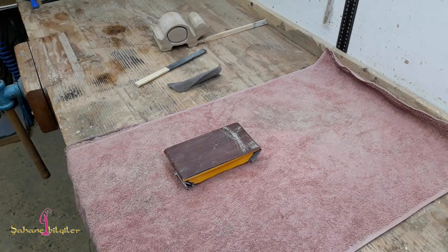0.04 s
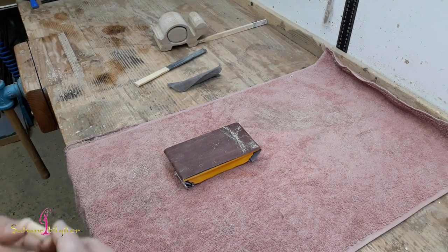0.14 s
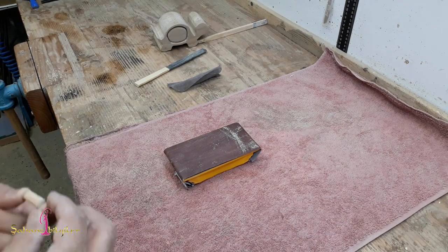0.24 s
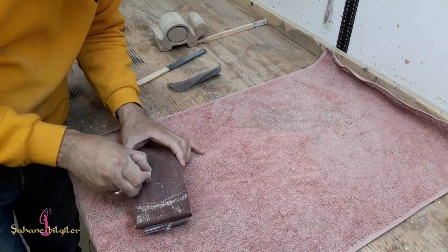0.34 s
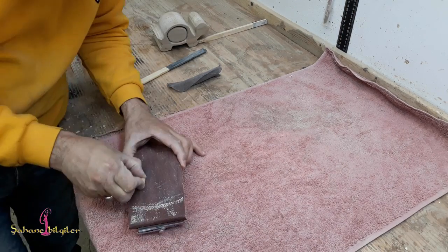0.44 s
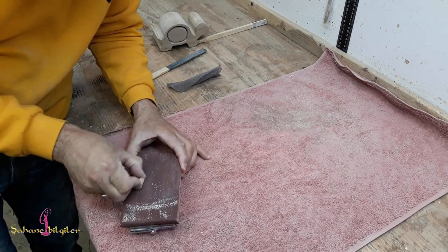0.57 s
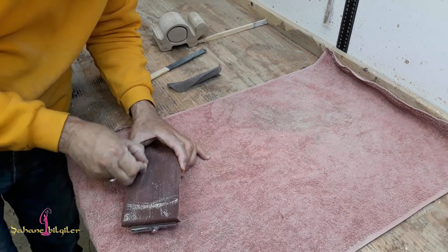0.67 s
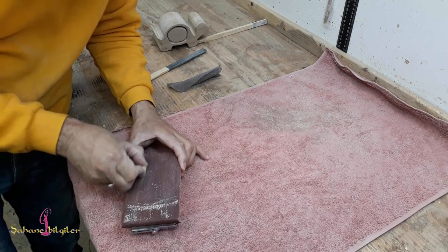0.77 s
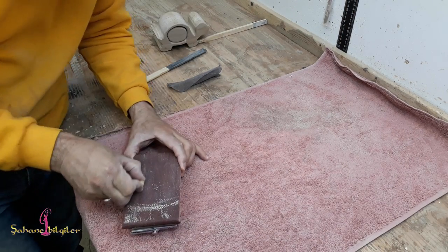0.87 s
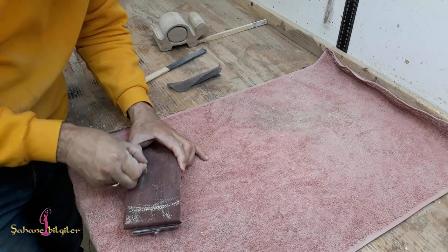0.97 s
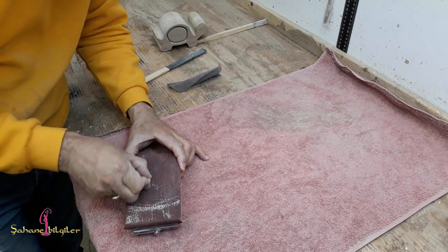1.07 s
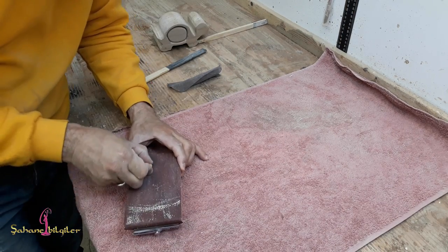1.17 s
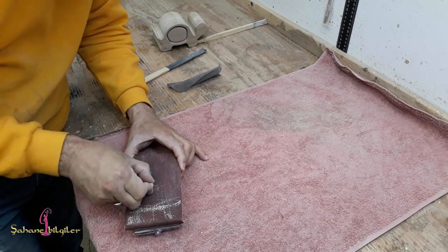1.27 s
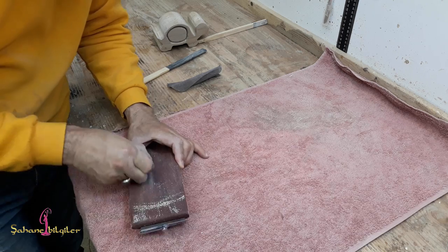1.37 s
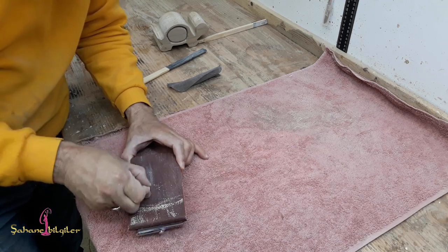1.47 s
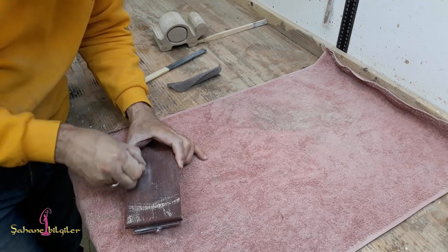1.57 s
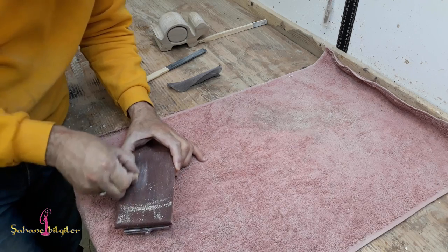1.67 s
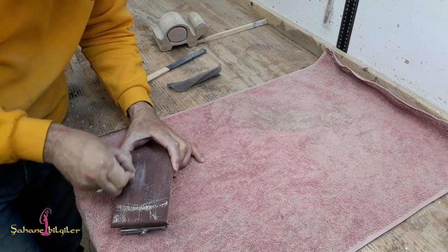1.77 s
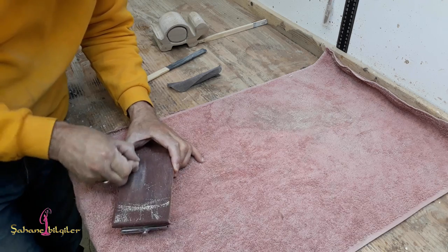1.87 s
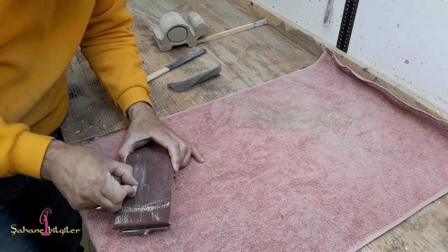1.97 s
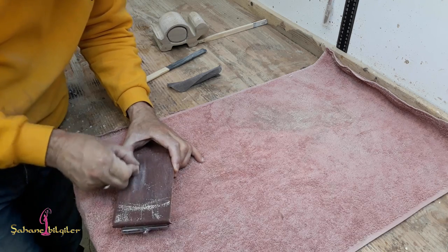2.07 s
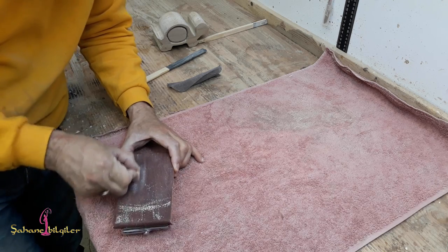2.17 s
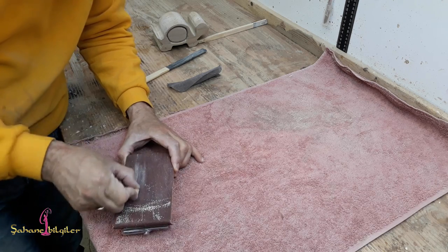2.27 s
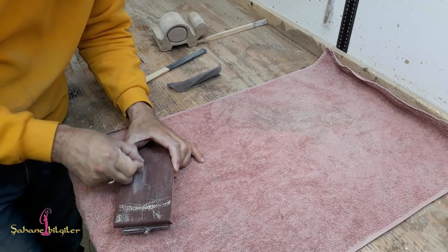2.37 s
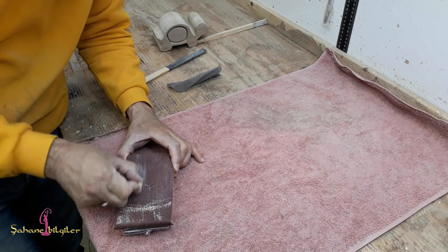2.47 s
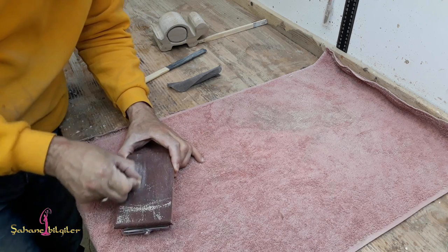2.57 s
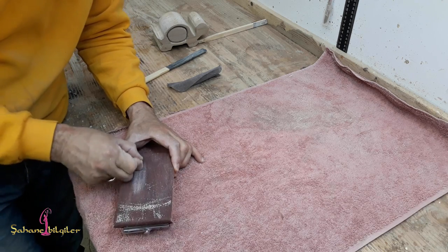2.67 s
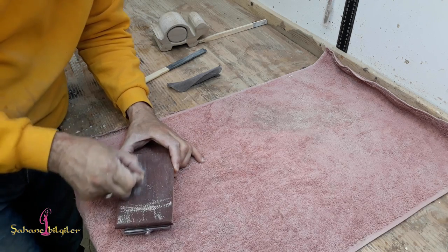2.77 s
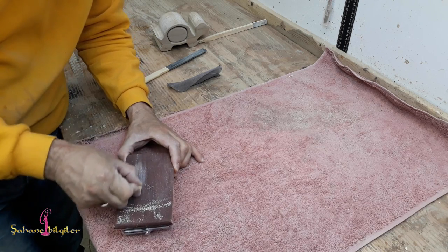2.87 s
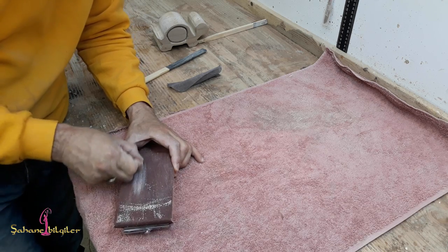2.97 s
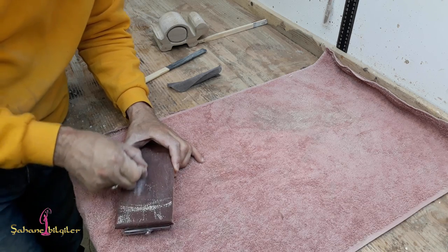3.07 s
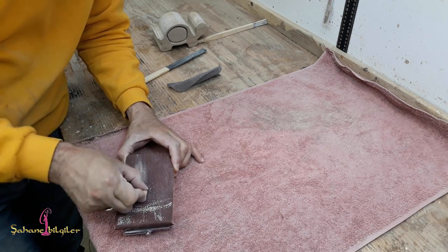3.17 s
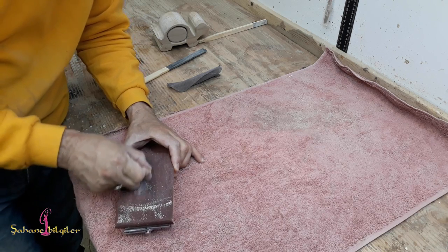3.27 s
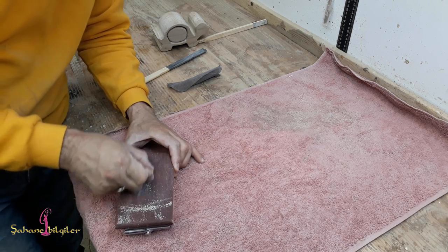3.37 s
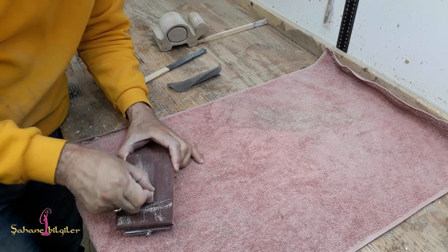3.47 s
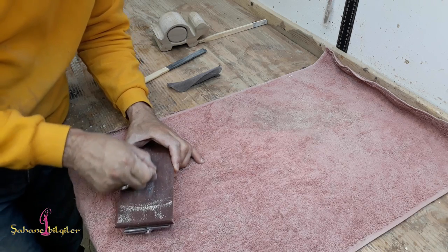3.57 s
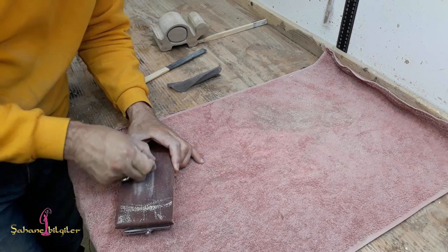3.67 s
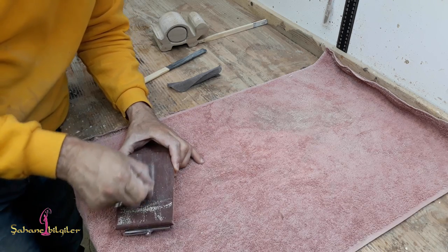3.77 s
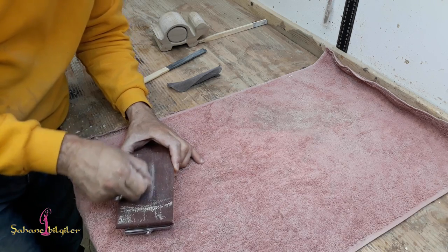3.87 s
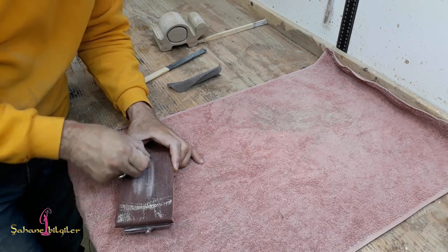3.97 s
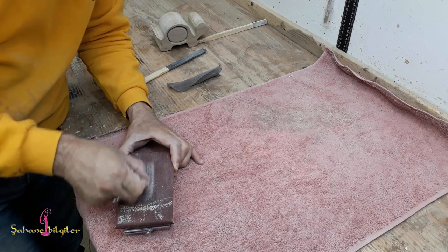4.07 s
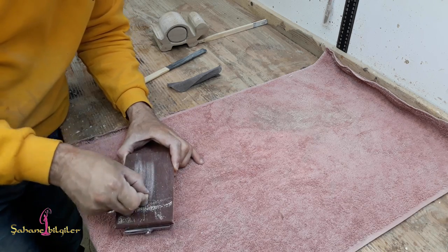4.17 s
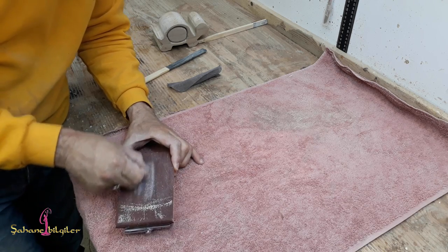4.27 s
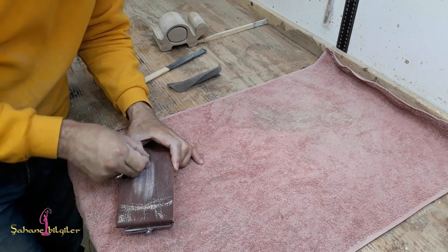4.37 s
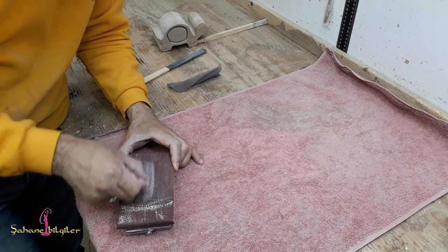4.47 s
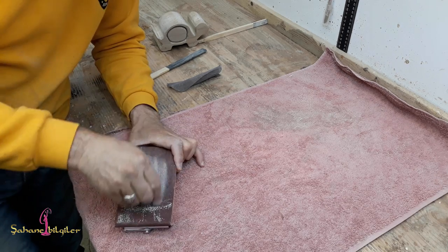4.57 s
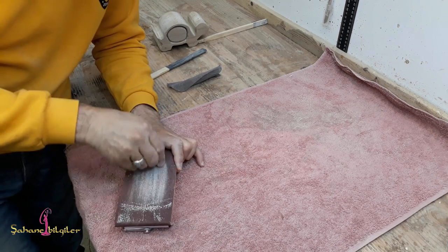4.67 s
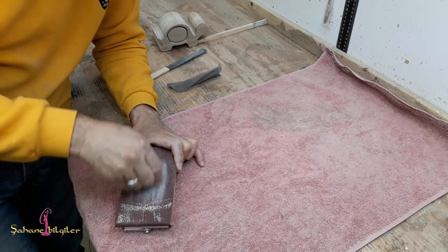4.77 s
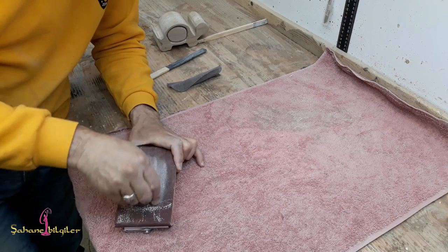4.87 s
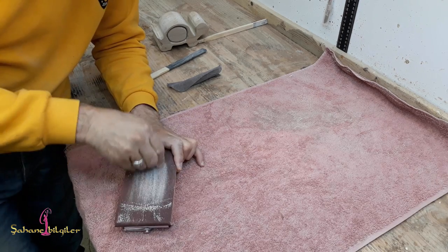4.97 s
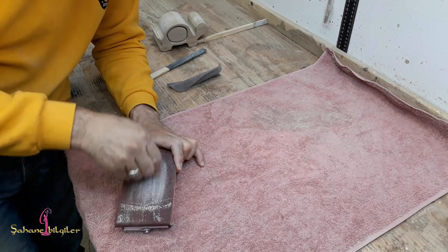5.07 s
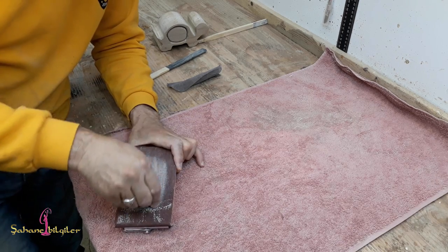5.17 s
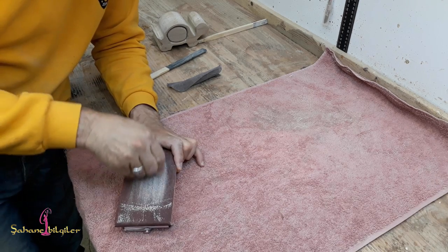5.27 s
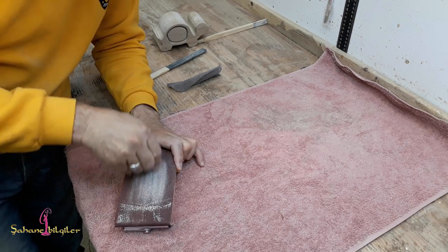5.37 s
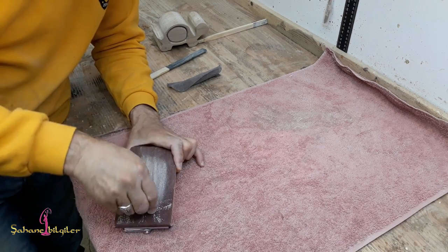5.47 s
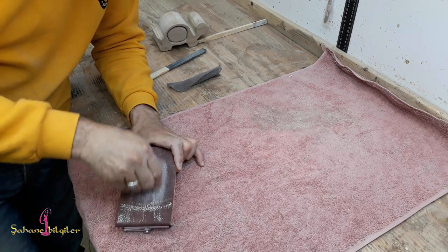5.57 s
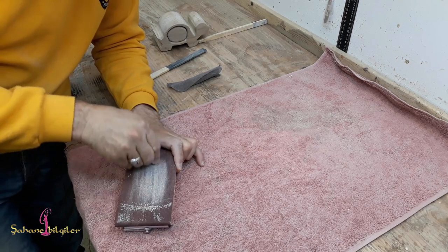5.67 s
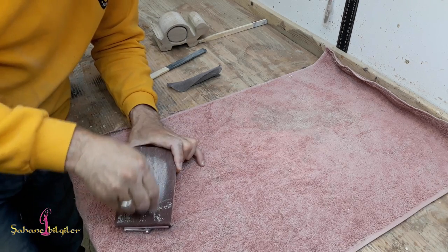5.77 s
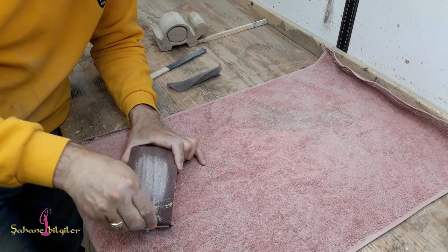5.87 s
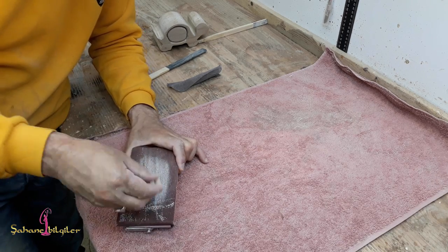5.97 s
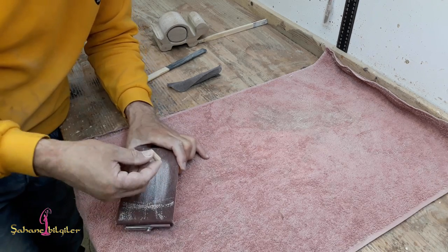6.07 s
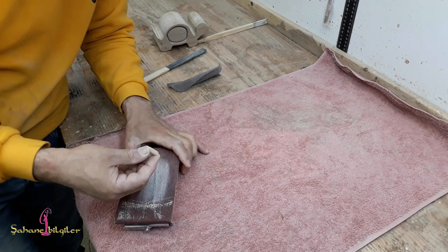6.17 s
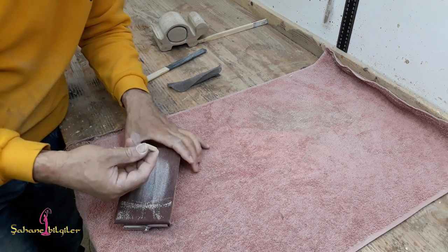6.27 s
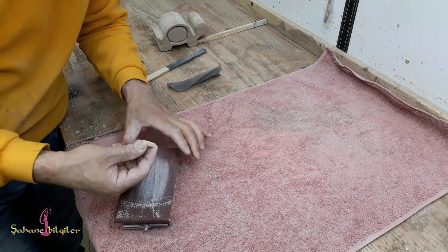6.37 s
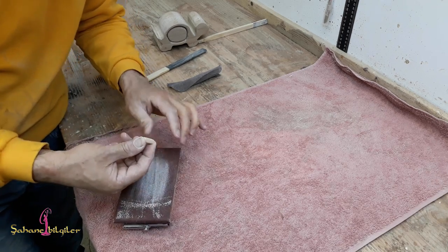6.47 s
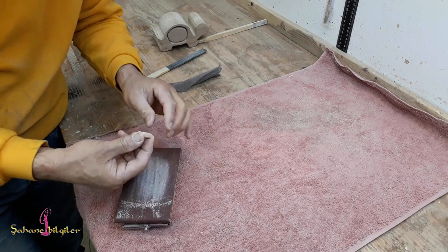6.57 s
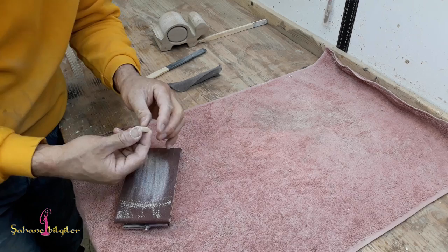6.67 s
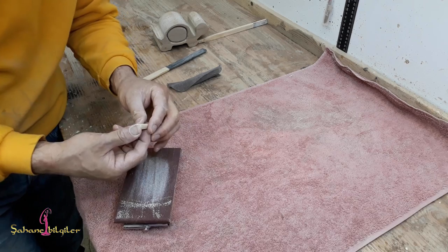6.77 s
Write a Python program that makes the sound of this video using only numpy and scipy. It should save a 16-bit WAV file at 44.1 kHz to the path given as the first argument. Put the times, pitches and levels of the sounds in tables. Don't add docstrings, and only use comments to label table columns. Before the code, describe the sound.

For the first 0.35 seconds there is only faint low room rumble, slight hiss and a barely audible creak. Then sanding starts, played far too fast: about fourteen back-and-forth cycles per second, a bright, gritty scritch-scratch with a high woody ring, strokes alternating in tone, with small cracks and chattering knocks, most noticeable from 0.4 to 2 seconds. It steadily grows fuller and louder until about 4.6 seconds. There the speed drops abruptly: slower, lower-pitched, coarser rasps, one every 0.16 seconds or so, with distinct dips at each reversal, small knocks and soft thumps into the padded bench. The last stroke tapers away around 5.9 seconds. From 5.9 to 6.4 seconds come faint finger rubs, a tiny tick near 6.3 and a low creak as weight lifts, then quiet room tone to the end, close to seven seconds. Close microphone, small, fairly dry workshop.

```python
import sys
import numpy as np
from scipy import signal
from scipy.fft import rfft, irfft, next_fast_len
from scipy.io import wavfile
from scipy.ndimage import uniform_filter1d

SR = 44100
rng = np.random.default_rng(int(sys.argv[2]) if len(sys.argv) > 2 else 0)


def int16_out(signal):
    q = np.round(np.clip(np.atleast_2d(signal).T, -1, 1) * 32767)
    wavfile.write(sys.argv[1], SR, q.astype(np.int16))


def volts(x):
    e = np.asarray(x, float) / 20
    return 10 ** e


N = 301158
TIME = np.arange(N) / SR
TRUE_SPEED_S = 4.629

# frequency in Hz, level in dB per Hz.
ROOM_TONE = [(15, -55.5), (25, -27), (70, -10.5), (82, -16), (101, -8), (228, -20.5), (471, -22),
             (875, -30), (14400, -33.5), (15200, -36), (15350, -75)]
# frequency in Hz, level in dB per Hz.
HISS = [(25, -12), (300, -14), (8300, -17), (9000, -50), (20000, -120)]
# frequency in Hz, t60 in seconds.
SHOP_DECAY = [(200, 0.36), (2000, 0.14), (10000, 0.44)]
# time in seconds, level in dB.
CREAK = [
    (0, -70),
    (.1, -76),
    (.2, -81.5),
    (5.9, -85.5),
    (6.05, -75),
    (6.2, -72.5),
    (6.35, -89),
]

# peak time in
# seconds, rub level in dB, fizz relative to the rub in dB, rise in seconds over 20 dB, fall in seconds over 20
# dB.
FINGERS = [(.25, -80, 5, .3, .4), (.358, -58, -14, .03, .02), (5.06, -55, -20, .04, .03),
           (5.712, -54, -20, .04, .03), (5.9, -68, -12, .02, .15), (6.02, -71, -9, .4, .2),
           (6.21, -72.5, -2, .12, .06), (6.297, -63, -16, .002, .018), (6.328, -64, -12, .06, .04),
           (6.348, -69, -12, .03, .02), (6.37, -78, -6, .1, .2)]
# frequency in Hz, level in dB per Hz.
RUB = [(400, -49), (700, -13.5), (1400, -13.5), (2600, -19.5), (3050, -7), (4250, -11), (4700, -18),
       (7000, -34), (13000, -120)]
# frequency in Hz, level in dB per Hz.
FIZZ = [(2650, -41.5), (4500, -10.5), (6000, -3.5), (6630, -6.5), (7530, -0.5), (10000, -18),
        (13000, -52.5), (22000, -120)]

# time in seconds, peak level in dB.
SNAGS = [(0.6459, -10), (1.057, -15), (1.438, -21), (1.565, -15), (1.8502, -16), (2.927, -14),
         (2.9365, -14), (3.596, -17), (2.63, -20), (2.7015, -20), (2.8527, -19), (3.766, -20),
         (4.3518, -18)]
# time in seconds, level in dB.
CATCHES = [(1.0196, -22), (1.071, -12.5), (1.3369, -23), (1.3683, -20.5), (1.8871, -21.5), (2.7726, -19.5),
           (2.8853, -23), (3.4764, -21), (3.5164, -22.5), (4.7795, -29), (4.8504, -30.5), (5.0854, -26.5),
           (5.1104, -25.5), (5.7684, -22.5)]
# three mode #
# frequencies in Hz, then hits of time in seconds, peak level in dB, t60 in seconds.
FAST_KNOCKS = [
    ((1250, 1540, 1860), [(.487, -41, 0.067), (.905, -44, 0.062)]),
    ((510, 530, 555), [(1.09, -43.5, 0.079), (1.338, -47, 0.15), (1.54, -46, 0.076), (2.038, -42.5, .13), (2.102, -41.5, 0.17), (4.09, -45.5, .12), (4.33, -47, 0.14), (4.42, -46.5, .15), (4.5, -47, 0.11)]),
    ((2500, 3300, 3100), [(.372, -44, .12), (.41, -45, .12), (1.055, -38.5, 0.061), (1.124, -34.5, 0.045), (1.193, -35.5, 0.065), (1.263, -37, 0.063), (1.333, -38.5, 0.071), (1.403, -42, 0.065), (1.436, -44, 0.12), (1.531, -32, 0.057), (1.602, -41.5, 0.067), (1.672, -37.5, 0.058)]),
]
# three mode frequencies
# in Hz, then hits of time in seconds, peak level in dB, t60 in seconds.
SLOW_KNOCKS = [((3230, 3580, 3900), [(4.766, -29, .14), (5.08, -30.5, .16), (5.394, -32, .17),
               (5.732, -32, .12)]), ((700, 780, 1270), [(4.76, -41, .3)]), ((1180, 1260, 1800),
               [(5.076, -35.5, .2), (5.105, -39, .12)]), ((612, 640, 1830), [(5.721, -36.5, .08)]),
               ((1000, 1085, 1140), [(4.845, -44, .12), (5.158, -37, .09), (5.18, -36, .12),
               (5.5, -45, .15)]), ((3300, 3420, 3700), [(4.835, -38, .15), (5.46, -37, .15),
               (5.255, -41, .1), (5.582, -43, .15)]), ((3680, 3800, 3950), [(5.01, -44, .2),
               (5.625, -41, .1), (5.655, -43, .2), (5.8, -38, .1)]), ((4650, 4900, 5150), [(4.93, -45, .25),
               (4.98, -43, .25), (5.31, -45, .25)]), ((2420, 2480, 2550), [(5.455, -42, .15)]),
               ((3050, 3600, 4150), [(6.2955, -56, .025), (6.3005, -60, .03)]), ((3000, 3200, 3450),
               [(6.318, -64, .15), (6.328, -63, .1)]), ((930, 1040, 1150), [(4.912, -47, .25),
               (4.95, -47, .2), (5.558, -44, .22), (5.588, -45, .2), (5.268, -47, .15)]), ((760, 772, 785),
               [(5.94, -70.5, .35), (5.968, -67, .3)]), ((4200, 4300, 4380), [(5.975, -75, 1.2)])]

# reversal in seconds, early level in dB, late level in dB.
PUSHES = [(0.361, -41, -37), (0.443, -36.5, -38.0), (0.518, -36, -37.0), (0.592, -32.5, -36),
          (0.662, -31.5, -34.5), (0.732, -31.5, -35), (0.803, -33.0, -36.0), (0.873, -35.5, -35),
          (0.944, -33, -36.0), (1.012, -29, -35.0), (1.082, -31, -33.5), (1.151, -31.5, -38.5),
          (1.22, -35, -36.0), (1.291, -33.5, -36), (1.361, -31, -36), (1.431, -27.5, -33.0),
          (1.493, -32, -36), (1.56, -30, -35), (1.631, -33.5, -39.5), (1.702, -33, -35.5),
          (1.772, -32.5, -36.5), (1.842, -31, -36), (1.914, -31.5, -34.5), (1.989, -31, -33),
          (2.058, -28.5, -32), (2.13, -30, -32), (2.202, -33, -35.5), (2.276, -31.5, -33.5),
          (2.35, -30.5, -35), (2.424, -30, -33.5), (2.499, -31.5, -33.0), (2.573, -31.0, -36),
          (2.648, -30.5, -34.5), (2.727, -30.0, -33.5), (2.802, -31, -34.5), (2.878, -30.5, -35),
          (2.955, -30.5, -34.5), (3.031, -29.5, -32.5), (3.105, -30.5, -33.5), (3.183, -30.5, -32.5),
          (3.258, -31, -32.5), (3.334, -27.5, -31), (3.41, -27.5, -30.5), (3.486, -29.5, -29.0),
          (3.563, -29.5, -31), (3.64, -30.0, -30.5), (3.718, -29, -28.5), (3.798, -27, -29.0),
          (3.875, -27.5, -31.0), (3.952, -29, -30.5), (4.027, -26.5, -28), (4.105, -30, -31),
          (4.186, -27.5, -28.5), (4.265, -28, -32), (4.345, -26.5, -29), (4.422, -27.5, -30.5),
          (4.502, -29.0, -30), (4.579, -29.0, -33), (4.655, -31, -31)]
# reversal in seconds, early level in dB, late level in dB.
PULLS = [(0.405, -37.5, -35.5), (0.481, -36.5, -34.5), (0.555, -37.5, -34.5), (0.628, -33.5, -29.5),
         (0.697, -34.5, -31), (0.768, -34.5, -33), (0.841, -36.5, -35.0), (0.908, -35.5, -32.0),
         (0.979, -32, -34.5), (1.046, -32.5, -28.0), (1.116, -33.5, -32), (1.187, -32, -32.5),
         (1.256, -33.5, -31.0), (1.325, -33.5, -31.5), (1.397, -32.5, -32.0), (1.465, -35.5, -29),
         (1.525, -33.0, -31.0), (1.595, -30, -29.5), (1.663, -31, -31.0), (1.738, -33.0, -31.5),
         (1.806, -32, -35), (1.877, -32.0, -30.5), (1.95, -32, -30), (2.023, -33.0, -30),
         (2.094, -32.5, -30), (2.165, -33.5, -28.5), (2.238, -30.5, -29.5), (2.312, -31, -29),
         (2.386, -33.5, -28), (2.461, -33.5, -29.5), (2.534, -34.5, -31.0), (2.608, -33.0, -28.5),
         (2.688, -32.5, -28.0), (2.764, -31.5, -28.5), (2.84, -32.0, -27.5), (2.915, -31.0, -26.5),
         (2.994, -33, -28.5), (3.069, -31.5, -28.5), (3.144, -33.0, -28.5), (3.221, -31, -28.0),
         (3.297, -31, -28.5), (3.373, -31, -28), (3.448, -28.5, -27.5), (3.525, -30.5, -29.5),
         (3.602, -29.0, -29.0), (3.68, -29.0, -28), (3.757, -28, -30), (3.836, -28.5, -27.5),
         (3.915, -29, -29.5), (3.989, -28.5, -28.5), (4.065, -30.0, -27.5), (4.146, -30, -27.5),
         (4.226, -29.5, -28.5), (4.306, -30.0, -28.0), (4.383, -31.5, -29.5), (4.462, -31.0, -27.5),
         (4.542, -31, -27), (4.617, -31.5, -30)]
# halt, early, late and wood level, all in dB.
LANDING = (-68, -46.5, -37.5, 0)
# reversal in seconds, halt level in dB, early level in dB, late level in dB.
SLOW = [
    (4.59, -39, -35.5, -37),
    (4.748, -60.5, -35.5, -32),
    (4.91, -51.5, -35, -37),
    (5.058, -56, -35, -30.5),
    (5.225, -49.5, -35.5, -37.5),
    (5.381, -58, -34.5, -32),
    (5.549, -50.5, -36, -35),
    (5.705, -58.5, -32, -34.5),
    (5.92, -69, -32, -41.0),
]
# end of the take-off, full early, full late and start of the halt as shares
# sped-up ones add the break-loose share of the stroke, share of ring left at the halt, jolt in dB.
FAST_PUSH = (0.1, 0.24, 0.65, 0.86, 0.82, 0.65, 0.0045, 1.02, 3.4)
FAST_PULL = (0.11, 0.22, 0.76, 0.83, 0.4, 0.8, 0.01, 1.03, 1.8)
SLOW_PUSH = (0.057, 0.22, 0.56, 0.83, 0.56, 0.52)
SLOW_PULL = (0.18, 0.62, 0.69, 1, 0.83, 0.57)
# stroke start in seconds, ring offset in dB.
ACCENTS = [(0.361, 2.5), (0.406, -2.0), (0.443, 1), (0.518, 1), (0.555, -2), (0.592, 1.5), (0.627, -5),
           (0.768, -2.0), (0.841, 1.5), (1.046, -1), (1.116, -2.0), (1.151, 1.5), (1.187, 2), (1.256, -3),
           (1.702, -0.5), (1.738, 0), (1.772, 2.0), (1.842, 3), (2.023, -1.5), (2.094, 1.5), (2.13, 1.5),
           (2.165, 1), (2.276, -2.5), (2.312, -2.0), (2.499, 1), (2.534, 2.5), (2.609, -1.5), (2.802, -2),
           (2.915, 0.5), (3.069, -3), (3.373, -3), (3.41, -4), (3.563, 2.0), (3.64, 2), (3.837, -1)]
# time in seconds, block ring in dB, piece ring in dB.
HOLD = [(.36, -8.5, 3.5), (.6, -20.5, -1), (.8, -14.5, 0), (1.05, -12, -0.5), (1.25, -11.5, 1.5),
        (1.55, -7.5, -.5), (1.7, -19.5, -0.5), (1.85, -25, -0.5), (2.3, -13, -0.5), (2.55, -8.5, 0.5),
        (3.0, -12, -2), (3.55, -5, 0), (4.0, -11, -2), (4.63, -10.5, -2.5)]
# reversal in seconds, stuck level in dB,
# early level in dB, late level in dB, time in seconds at which it slows down.
SLOW_RING = [(4.615, -60, -44.5, -54, 4.68), (4.749, -67, -40, -41.5, 4.87),
             (4.905, -58, -43.5, -56.5, 4.9), (5.062, -69.5, -39, -44.5, 5.17),
             (5.222, -59.5, -43, -52.5, 5.34), (5.381, -65.5, -44.5, -47, 5.515),
             (5.548, -61.5, -42, -52, 5.692), (5.713, -73, -39.5, -44, 5.79)]
# time in seconds, level in dB.
LIFTED = (5.916, -76.5)
# time in seconds, level in dB.
WEIGHT = [(.36, -58.5), (1.3, -54.5), (2.0, -54), (2.9, -51.5), (3.4, -52.5), (4.63, -50)]
# peak time in seconds, peak level in dB.
PRESSES = [(4.696, -60), (4.78, -61), (4.846, -44.5), (5.104, -41.5), (5.202, -47), (5.402, -59),
           (5.508, -46.5), (5.74, -48), (5.81, -54.5)]

# frequency in Hz, level in dB per Hz.
FAST_GRIT = [(15, -54), (25, -17.5), (184, -23.5), (500, -18.5), (1900, -17), (3750, -13), (4300, -11),
             (5600, -10.3), (8000, -10), (10000, -4.5), (12500, -5), (14000, -1.2), (15700, -3.5)]
SLOW_GRIT = [(15, -54), (25, -17.5), (120, -12.5), (435, -17.5), (706, -12.5), (2070, -7), (2900, -3),
             (3400, -1.5), (4200, -4), (7500, -4), (8300, -5), (9300, -13.5), (15700, -11)]
# frequency in Hz, share of the fade.
DULL = [(1600, 0), (2100, 1), (3500, 1), (3900, 0), (5100, 0), (5700, .4), (8000, .4), (9200, 0)]
# frequency in Hz, width in Hz, level in dB.
FAST_WOOD_EARLY = [(2540, 225, -9), (2966, 138, -11), (3594, 280, -6.5), (4090, 80, 1.5), (4390, 42, 4.5),
                   (4600, 95, -2), (4740, 214, 0.5)]
FAST_WOOD_LATE = [(3813, 130, -5.5), (4126, 80, -2), (4348, 45, 3.5), (4590, 130, -2.5), (4930, 83, -3)]
SLOW_WOOD_EARLY = [(597, 51, -2.5), (784, 130, 2), (1160, 190, -4), (1657, 100, -3)]
SLOW_WOOD_LATE = [(640, 100, -27), (938, 200, 9.5), (1180, 120, 8.5)]
# frequency in Hz, width in Hz, level in dB.
FAST_BLOCK = [(2503, 59, -2), (2997, 110, -1), (6220, 36, 0), (6320, 30, 5), (6320, 31, -6.5),
              (6820, 46, -2), (7276, 120, -0.5), (8200, 66, -3.5), (8730, 65, -0.5), (10300, 130, -11),
              (14500, 300, -4.5), (15220, 450, -6.5)]
SLOW_BLOCK = [(1870, 110, -7), (2290, 50, 6), (3390, 170, 7.5), (4720, 190, -13), (5600, 48, -3),
              (6400, 66, -6), (7400, 230, -4.5)]
# frequency in Hz, width in Hz, level in dB.
FAST_BENCH = [(50, 70, -9.5), (249, 64, -3.5), (328, 29, 0), (522, 62, 0)]
SLOW_BENCH = [(80, 60, -7), (133, 36, 0.5)]

# centre in seconds, centre in Hz.
BLURS = [(0.372, 12490), (0.38, 10080), (1.402, 10940), (1.472, 11200), (1.501, 12230), (1.959, 9220),
         (2.203, 10420), (2.284, 12660), (2.363, 9910), (2.426, 9130), (2.772, 9820), (3.219, 9820),
         (3.329, 10770), (3.448, 10770), (3.448, 12660), (3.593, 13350), (3.614, 10680), (3.672, 12140),
         (3.68, 10510), (3.892, 12660), (4.078, 11110), (4.081, 10590), (4.145, 11200), (4.191, 9910),
         (4.232, 14040), (4.232, 14730), (4.264, 11370), (4.38, 9820), (4.423, 14040), (4.566, 10590),
         (4.589, 12140), (4.653, 14130), (4.676, 10160), (4.763, 12140), (4.786, 12490), (4.789, 13610),
         (4.792, 14560), (4.795, 10160), (4.873, 10510), (4.876, 11630), (4.879, 14560), (4.949, 12490),
         (4.955, 10940), (4.96, 10510), (4.981, 14810), (5.079, 15330), (5.256, 14470), (5.306, 12920),
         (5.306, 14640), (5.332, 11200), (5.332, 13520), (5.352, 14470), (5.393, 14640), (5.419, 13260),
         (5.445, 11460), (5.605, 11970), (5.686, 12490), (5.689, 13700), (5.738, 11110), (5.744, 14300)]


def unit(x):
    return x / np.sqrt(np.mean(x ** 2) + 1e-20)


def along(points, hz):
    f, value = np.transpose(points)
    return np.interp(np.log(hz + 1), np.log(f + 1), value)


def over_time(points):
    return np.interp(TIME, *np.transpose(points))


def filtered(x, response):
    m = next_fast_len(N + SR // 8)
    return irfft(rfft(x, m) * response(np.fft.rfftfreq(m, 1 / SR)), m)[..., :N]


def coloured(x, colour):
    return unit(filtered(x, lambda hz: volts(along(colour, hz))))


def modes(table):
    def response(f):
        return sum((-1) ** k * volts(db) * 1j * f * w / (c * c - f * f + 1j * f * w)
                   for k, (c, w, db) in enumerate(table))
    return response


def swell(s, db, rise, fall):
    return volts(db - 20 * np.where(TIME < s, (s - TIME) / rise, (TIME - s) / fall))


def grit(spiky_db, patchy_db, frames):
    breaks = rng.standard_normal(N)
    size = np.minimum(rng.exponential(size=N // 8 + 1), 2.4)
    breaks = breaks * volts(spiky_db * size.repeat(8)[:N])
    z = signal.stft(breaks, nperseg=256)[2]
    field = uniform_filter1d(rng.standard_normal(z.shape), size=4, axis=0)
    field = uniform_filter1d(field, size=frames, axis=1)
    return unit(signal.istft(z * volts(patchy_db * unit(field)), nperseg=256)[1][:N])


def channel_hiss():
    hiss = volts(-87) * coloured(rng.standard_normal(N), HISS)
    return np.array([hiss, -hiss])


def room_tone():
    return volts(-74) * coloured(grit(0.35, 1.4, frames=20), ROOM_TONE)


def bench_creak():
    creak = filtered(rng.standard_normal(N), modes([(315.6, 40, 0)]))
    return volts(over_time(CREAK)) * unit(creak)


def shop_reverb(x):
    hz, t, z = signal.stft(rng.standard_normal(SR // 2), SR, nperseg=256)
    decay = volts(-60 * t / along(SHOP_DECAY, hz)[:, None])
    tail = signal.istft(z * decay, SR, nperseg=256)[1]
    return signal.fftconvolve(x, tail / np.linalg.norm(tail))[:N]


def fingers():
    dust = grit(1.2, 1.0, frames=6)
    rub, fizz = coloured(dust, RUB), coloured(dust, FIZZ)
    return sum(swell(s, db, rise, fall) * (rub + volts(fizz_db) * fizz)
               for s, db, fizz_db, rise, fall in FINGERS)


def snags():
    out, t = np.zeros(N + SR), np.arange(SR // 5) / SR
    for s, db in [*SNAGS, *[(s, db + 5.5) for s, db in CATCHES]]:
        crack = np.diff(rng.standard_normal(len(t) + 1))
        out[round(s * SR):][:len(t)] += volts(db - 13.0 - 60 * t / 0.0051) * crack
    return out[:N]


def knocks():
    out, t = np.zeros(N + SR), np.arange(SR // 5) / SR
    attack = 1 - np.exp(-t / .004)
    fade = np.minimum(8 * (1 - t / t[-1]), 1)
    for tones, rows in FAST_KNOCKS + SLOW_KNOCKS:
        for s, db, t60 in rows:
            wander = np.cumsum(rng.standard_normal((3, len(t))), axis=1)
            wander *= np.sqrt(np.array(tones)[:, None] * 4e-6)
            ring = np.sin(2 * np.pi * np.outer(tones, t) + wander).sum(0)
            out[round(s * SR):][:len(t)] += volts(db - 60 * t / t60) * attack * ring * fade
    return out[:N]


def fast_rows():
    k = np.arange(len(PUSHES) + len(PULLS))
    pull = k % 2
    start, early, late = np.vstack([PUSHES, PULLS])[k // 2 + pull * len(PUSHES)].T
    early, late = early - 3.5, late - 3.5
    luck = 0.54 * rng.standard_normal((len(k), 2))
    halt = uniform_filter1d((early + late) / 2, size=4) - 13.5 + luck[:, 0]
    wood = np.where(pull, -2.7, -2.6) + np.interp(start, *np.transpose(HOLD)[::2]) + luck[:, 1]
    for at, ring_db in ACCENTS:
        wood[np.abs(start - at).argmin()] += ring_db
    levels = np.column_stack([halt, early, late, wood])
    levels[0] = LANDING
    return np.column_stack([start, levels])


def stroke_parts(rows, push, pull, first):
    back = (np.arange(len(rows) - 1) + first) % 2
    shape = np.array([push, pull])[back].T
    turns = np.sort(np.clip(shape[:4], .02, .98), axis=0)
    return back, shape, np.vstack([0 * back, turns])


def stroke_curve(rows, share, db):
    start, end = rows[:-1, 0], rows[1:, 0]
    moments = (start + share * (end - start)).T.ravel()
    levels = np.transpose(db).ravel()
    return np.interp(TIME, np.append(moments, end[-1]), np.append(levels, rows[-1, 1]))


def motion(rows, push, pull, first):
    back, shape, share = stroke_parts(rows, push, pull, first)
    start, turn, early, late = rows[:-1].T[:4]
    halt = rows[1:, 1]
    takeoff = turn + shape[4] * (early - turn)
    slowing = halt + shape[5] * (late - halt)
    level = stroke_curve(rows, share, [turn, takeoff, early, late, slowing])
    current = np.clip(np.searchsorted(start, TIME) - 1, 0, None)
    full = uniform_filter1d(np.maximum(early, late)[current], size=200)
    place = np.interp(TIME, rows[:, 0], np.append(back, 1 - back[-1]))
    return level, place, full


def fast_ring(rows, push, pull):
    _, shape, share = stroke_parts(rows, push, pull, 0)
    start, turn, early, late, wood = rows[:-1].T
    halt = rows[1:, 1]
    stuck_share, rest_db = 0.082, 0.15
    moved = 0.28 * np.maximum(late - early, 0) * (start > start[0])
    early, late = early + moved, late - moved
    stuck = np.full(len(start), stuck_share)
    at = np.vstack([0 * start, stuck, stuck + np.abs(shape[6]), share[3], share[4]])
    rest = turn + rest_db
    left = wood + halt + shape[7] * (late - halt)
    return stroke_curve(rows, at, [rest, rest, early + wood + shape[8], late + wood, left])


def slow_ring():
    s, stuck, early, late, slows = np.transpose(SLOW_RING)
    moments = np.transpose([s, s + 0.013, slows]).ravel()
    levels = np.transpose([stuck, early, late]).ravel()
    return np.interp(TIME, [*moments, LIFTED[0]], [*levels, LIFTED[1]])


def pull_tilt(place):
    return uniform_filter1d(np.where(np.gradient(place) < 0, .5 - place, 0), size=150)


def scratching(colour, level, place, full, grain, split_hz, lag_s, treble_power,
               treble_tilt_db, evenness):
    ripple = rng.standard_normal(400)

    def tone(hz):
        return volts(along(colour, hz) + 1.7 * np.interp(hz, np.arange(400) * 60, ripple))
    scratch = unit(filtered(grit(*grain), tone))
    top = filtered(scratch, lambda hz: 1 / (1 + (split_hz / (hz + 1)) ** 8))
    late = np.interp(TIME - lag_s, TIME, level)
    fine = late - level + (treble_power - 1) * (late - full) + treble_tilt_db * pull_tilt(place)
    fine -= evenness * (full - uniform_filter1d(full, size=9000))
    return scratch - top + top * volts(fine)


def sanding(path, ring_db, colour, wood_early, wood_late, block, block_db, bench, lean_db, grain,
            scratch_db, wood_db, bench_db, bench_power, low_tilt_db, **treble):
    level, place, full = path
    scratch_level = level + scratch_db
    out = volts(scratch_level) * scratching(colour, level, place, full, grain, **treble)
    rub = grit(*grain)

    def ringing(table):
        lowest = table[0][0]
        return unit(filtered(rub, lambda hz: modes(table)(hz) * hz ** 2 / (hz ** 2 + lowest ** 2)))
    piece = np.sqrt(1 - place) * ringing(wood_early) + np.sqrt(place) * ringing(wood_late)
    out += volts(ring_db + wood_db) * unit(piece)
    out += volts(scratch_level + block_db) * ringing(block)
    dull = filtered(out, lambda hz: along(DULL, hz))
    out = out + dull * (volts(low_tilt_db * pull_tilt(place)) - 1)
    return out + volts(lean_db + bench_power * (level - full) + bench_db) * ringing(bench)


def fast_sanding():
    rows = fast_rows()
    return sanding(
        motion(rows, FAST_PUSH, FAST_PULL, 0), fast_ring(rows, FAST_PUSH, FAST_PULL),
        FAST_GRIT, FAST_WOOD_EARLY, FAST_WOOD_LATE, FAST_BLOCK, np.interp(TIME, *np.transpose(HOLD)[:2]),
        FAST_BENCH, over_time(WEIGHT), grain=(2.0, 2.3, 3),
        scratch_db=4.0, wood_db=-0.6, bench_db=-1.0, bench_power=0.63, low_tilt_db=-9,
        split_hz=8998.5, lag_s=.0007, treble_power=1.25, treble_tilt_db=4.5, evenness=.1)


def slow_sanding():
    presses = sum(swell(s, db, 0.028, 0.054) for s, db in PRESSES)
    pressing = 20 * np.log10(presses + volts(-67.5))
    lean_db = pressing - 5.5 - 500 * np.maximum(TIME - 5.875, 0)
    return sanding(
        motion(np.array(SLOW), SLOW_PUSH, SLOW_PULL, 1), slow_ring(),
        SLOW_GRIT, SLOW_WOOD_EARLY, SLOW_WOOD_LATE, SLOW_BLOCK, -14,
        SLOW_BENCH, lean_db, grain=(0.7, 2.4, 8),
        scratch_db=1.3, wood_db=-1.5, bench_db=-3.5, bench_power=-0.66, low_tilt_db=-1.5,
        split_hz=6002, lag_s=.003, treble_power=1.6, treble_tilt_db=1.5, evenness=.05)


def sanding_strokes():
    after = np.clip((TIME - TRUE_SPEED_S) / .002, 0, 1)
    landing = np.clip((TIME - PUSHES[0][0]) / 0.028 + 1, 0, 1)
    lift = volts(-300 * np.maximum(TIME - SLOW[-1][0] + .02, 0))
    return landing * lift * (fast_sanding() * (1 - after) + slow_sanding() * after)


def scene():
    work = sanding_strokes() + snags() + knocks() + fingers()
    background = room_tone() + bench_creak() + channel_hiss()
    return work + volts(-19) * shop_reverb(work) + background


def blurred(x):
    hz, t, z = signal.stft(x.mean(0), SR, nperseg=512)
    s, centre = np.transpose(BLURS)
    in_band = np.exp(-((hz[:, None] - centre) / 230) ** 4)
    in_time = np.exp(-((t - s[:, None]) / 0.016) ** 4)
    turn = np.minimum(1.3 * in_band @ in_time, 1) * 1.5
    for at in (3.692, 5.55):
        turn = turn + .15 * np.outer(hz > 4200, np.abs(t - at) < .012)
    other = np.abs(z) * np.exp(2j * np.pi * rng.random(z.shape))
    change = np.array([z * (np.cos(turn) - 1), volts(2) * other * np.sin(turn)])
    mid, side = signal.istft(change, SR, nperseg=512)[1][:, :N]
    return x + np.array([mid + side, mid - side])


def low_pass(x):
    return signal.sosfilt(signal.butter(12, 15780, fs=SR, output="sos"), x)


def record(dry):
    soft = dry / (1 + np.abs(dry / .17) ** 4) ** .25
    narrow = filtered(blurred(soft), lambda hz: hz < 15800)
    return low_pass(narrow)


dry = scene()
out = record(dry)
int16_out(out)
```